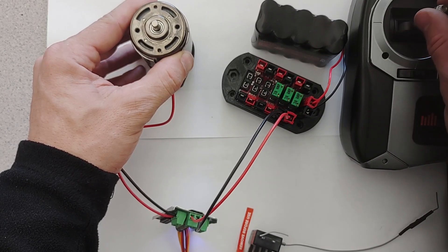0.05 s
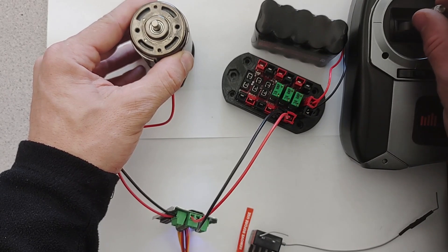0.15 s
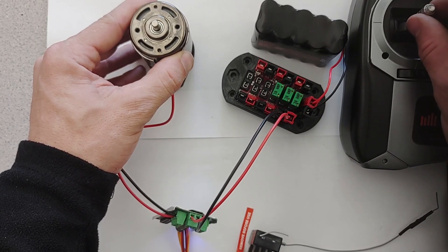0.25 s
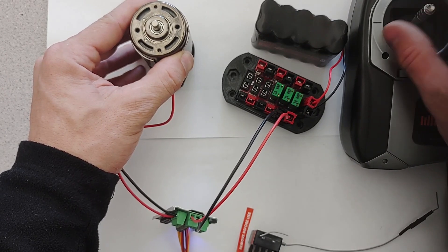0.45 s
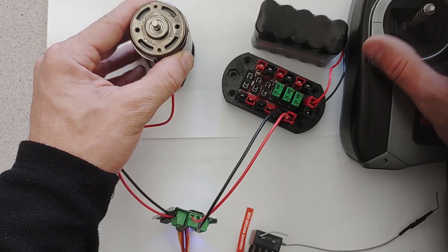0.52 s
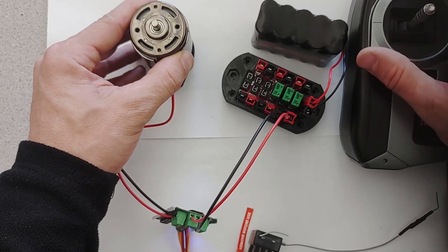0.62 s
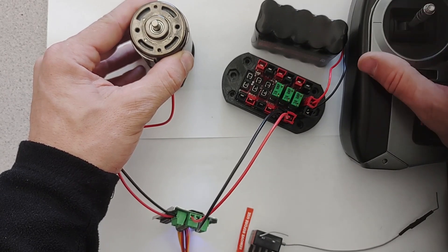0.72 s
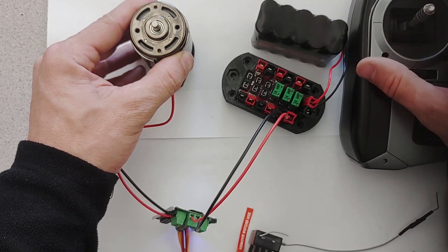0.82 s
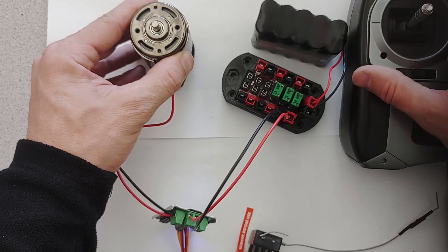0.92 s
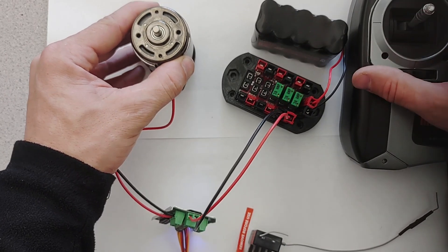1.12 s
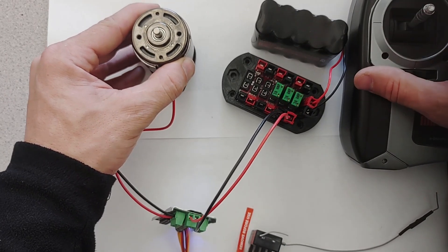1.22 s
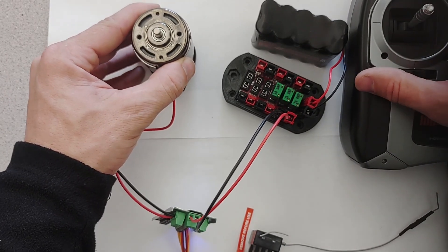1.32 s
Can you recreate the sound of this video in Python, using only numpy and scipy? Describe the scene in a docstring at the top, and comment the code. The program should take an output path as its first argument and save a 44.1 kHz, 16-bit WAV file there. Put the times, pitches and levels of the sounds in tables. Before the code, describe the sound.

A small hand-held electric motor spins up from about 0.1 s, peaks near 0.32 s with bright raspy hiss and a rising whine, then drops in pitch and fades by 0.5 s. A soft plastic lever click follows at 0.74 s, dull taps and finger brushes around 0.92 s, faint clicks at 1.2 and 1.31 s. Low steady machine hum and bassy room air continue throughout, close stereo microphone.

```python
"""A room's steady machine hum and low rush of air, then a small brushed motor spins up and coasts down once.
The motor is held in a hand, near a stereo microphone: shaped noise for its brush hiss, shaft orders
and noise ringing resonances for its casing, multiples of the shaft speed for its whine.
A plastic lever clicks (decaying sines); soft taps and fingers brushing plastic are filtered noise.
The hum is wavering sines, the air shaped noise."""
import sys
import numpy as np
from scipy import signal
from scipy.io import wavfile
from scipy.ndimage import uniform_filter1d

SR = 44100
rng = np.random.default_rng(int(sys.argv[2]) if len(sys.argv) > 2 else 0)


def wav_out(sig):
    """Save sig, one row per channel (or a flat mono array), as 16-bit PCM at SR to the path in sys.argv[1]."""
    wavfile.write(sys.argv[1], SR, np.round(np.clip(np.atleast_2d(sig).T, -1, 1) * 32767).astype(np.int16))


def volts_from_db(level):
    """Convert decibel levels to linear amplitude ratios."""
    exponent = np.asarray(level, float) / 20
    return 10 ** exponent


N = 59535  # samples

# Brush hiss over time, before its flicker. Each row: time in seconds, level in dB.
HISS_LEVEL = [(.1, -87), (.13, -66), (.164, -61), (.18, -55), (.202, -46), (.236, -38), (.266, -34),
              (.326, -32.5), (.366, -33.5), (.398, -36.5), (.43, -46.5), (.465, -58), (.478, -70),
              (.56, -85)]
# Shaft speed. Each row: time in seconds, speed in Hz.
SHAFT_SPEED = [(.1, 60), (.175, 123), (.195, 143), (.235, 170), (.265, 184), (.3, 208), (.318, 211),
               (.345, 203), (.357, 184), (.395, 163), (.428, 143), (.447, 125), (.49, 112), (.56, 50)]
# Colour of the brush hiss. Each row: frequency in Hz, relative density in dB.
HISS_COLOUR = [(3000, -40), (3900, -35), (4150, -13.5), (4850, -8.5), (5300, -1), (6260, -6), (7200, 2.5),
               (8300, 3), (9900, 2.5), (11300, -4), (12300, -3), (13300, 1), (15500, -2.5), (16500, -35)]
# Can modes in the hiss. Each row: frequency in Hz, width in Hz, gain in dB before RING_DB.
CAN_MODES = [(3900, 39, -23), (4300, 43, 3), (7310, 48, 8), (9000, 18, -22), (9810, 170, 5.5),
             (11380, 200, 12.5), (13700, 41, -7), (13500, 130, -17), (15600, 110, -10)]
# Likeness of the hiss at the two microphone ports. Each row: frequency in Hz, correlation before scatter.
HISS_LIKENESS = [(3000, .65), (16000, .6)]
# Side the hiss leans to. Each row: frequency in Hz, left minus right in dB.
HISS_LEAN = [(60, -4.5), (180, -4), (550, -2), (1650, -14), (4970, -7), (15000, -4.0)]
# Reflections turn one port against the other. Each row: frequency in Hz, phase scatter in radians rms.
HISS_PORT_SCATTER = [(3000, 3.16), (16000, 2.4)]
# Casing and table resonances that the shaft orders sweep through. Each row: frequency in Hz, nominal width
# in Hz, gain in dB, dB gained per dB of hiss, left minus right in dB, radians by which left leads.
CASING_MODES = [(163.8, 19, -6, .5, 9.5, 0.34), (193.2, 35, -6.5, 1.2, 13, 1.6),
                (357.4, 25.7, -14.5, 0.18, 9.5, 0.39), (647, 51, -20, 0.2, 0.5, 1.56),
                (743, 85, -11, 0.2, 3.5, 0.82), (829, 100, -10, 1.7, 15, 2.24),
                (1105, 44.5, -9.5, 0.46, -3, 0.51), (1250, 150, -16.5, 2.14, -4.5, .9),
                (2155, 170, -8.5, 0.47, -2, 1.4), (2353, 67, -6, 2.6, 18, 0.96), (2496, 67, -3, 9, -8, 1.4),
                (3019, 317, -9.5, 0.33, 0, 1.66), (3200, 110, -5, .45, 5, 2.6)]
# Orders that shake the casing. Each row: multiple of shaft speed, relative level in dB.
SHAFT_ORDERS = [(1, -2), (2, -18.5), (2.45, -7.5), (4, -16.5), (6, -6)]
# Commutator whine. Each row: multiple of shaft speed, level in dB rms at top speed before
# flicker and pan, left minus right in dB.
WHINE_ORDERS = [(10, -55, 0), (12, -53, 0), (14, -50, 1), (16, -55, 0), (20, -52, -8), (22, -51, -8),
                (24, -51, -5), (26, -50, -4)]
# How well the casing sounds the whine. Each row: frequency in Hz, gain in dB.
WHINE_RADIATION = [(1500, -20), (1900, -12), (2080, 0), (3400, 0), (3600, -14), (3950, -16), (4150, 0),
                   (6000, 0)]
# Lever clicks. Each row: start in seconds, peak of the first blow in dB before pan, delay of the second
# blow in seconds, second blow against the first in dB, left minus right in dB.
LEVER_CLICKS = [(.7352, -38, .0033, -1, 4), (1.1990, -42, .0036, -1, 2), (1.3082, -40, .0036, -1, 2)]
# Modes of the lever. Each row: frequency in Hz, relative level in dB, 60 dB decay time in seconds.
LEVER_MODES = [(2080, -22, 0.031), (2530, -14, 0.022), (2520, 0.5, 0.0057), (1156, -29.5, 0.021)]
# Soft taps. Each row: start in seconds, level in dB before rise and decay, centre in Hz,
# 60 dB decay time in seconds.
SOFT_TAPS = [(.7395, -59, 4500, .02), (.9165, -50, 700, .03), (.9555, -55, 2200, .03),
             (.9560, -59, 11000, .03)]
# Finger brushes. Each row: start in seconds, length in seconds, level in dB before fades, grain and pan,
# centre in Hz, width in Hz of each of two filters.
FINGER_BRUSHES = [(.535, .03, -71.5, 8840, 2960), (.640, .03, -79, 12000, 5000),
                  (.915, .08, -68.5, 13200, 3000), (.935, 0.064, -72.5, 9970, 3000),
                  (1.053, 0.021, -65.5, 10700, 700), (1.055, 0.024, -73, 13700, 2000),
                  (1.140, 0.078, -70, 9600, 9100), (1.180, 0.14, -69.5, 8800, 4240),
                  (1.320, .06, -65, 11000, 7100)]
# Machine hum. Each row: frequency in Hz, level in dB rms before waver and pan.
HUM_LINES = [(59.2, -87), (118.4, -56), (220.7, -52), (242.2, -56), (258.4, -56.5), (479.1, -79),
             (597.5, -84.5), (721.4, -81.5)]
# Colour of the room air. Each row: frequency in Hz, relative density in dB.
AIR_COLOUR = [(12, -53), (20, -20.5), (43, -14), (101, 0.5), (177, -5.5), (234, -5), (285, -10.5),
              (319, -23), (446, -25), (542, -33), (718, -24.5), (976, -30), (1570, -36), (2140, -35),
              (2530, -32), (2910, -31.5), (3840, -42), (9950, -48), (16000, -51.5)]
# Likeness of the air at the two ports. Each row: frequency in Hz, correlation before scatter.
AIR_LIKENESS = [(60, 0.77), (180, 0.81), (550, 0.5), (1650, 0.22), (4970, -0.02), (15000, 0.05)]
# Side the air leans to. Each row: frequency in Hz, left minus right in dB.
AIR_LEAN = [(60, -4.5), (180, 2), (550, -1.5), (1650, 3.5), (4970, 0.5), (15000, -5)]
# Reflections in the air sound. Each row: frequency in Hz, phase scatter in radians rms.
AIR_PORT_SCATTER = [(40, 0.18), (200, 0.28), (1000, 1.18), (4000, 1.1), (16000, 0.6)]

RING_DB = -6.5  # the can modes against the plain hiss
FULL_DB = -30  # hiss level at which the casing modes have their listed gain
CASING_DB, RATTLE_DB = -29, 8  # drive of the casing; noise beside the orders
TOP_HZ, WHINE_FALL_DB = 211, 90  # the whine loses WHINE_FALL_DB x the share of top speed missing
LEVER_LEAD = 0.36  # radians by which left leads
AIR_DB = -48.5  # rms of the air, left and right averaged


def evened(x):
    """Scales to rms 1."""
    return x / np.sqrt(np.mean(x ** 2) + 1e-20)


def read(points, hz):
    """Reads a curve along a logarithmic frequency axis."""
    f, value = np.transpose(points)
    return np.interp(np.log(hz + 1), np.log(f + 1), value)


def add(mix, s, sound):
    """Lays a stereo sound into the mix at s seconds."""
    part = mix[:, round(s * SR):][:, :sound.shape[1]]
    part += sound[:, :part.shape[1]]


def sides(db):
    """Left and right gains that differ by db."""
    return volts_from_db(np.array([[.5], [-.5]]) * db)


def resonate(x, hz, width):
    """A two-pole resonance of gain 1."""
    return signal.lfilter(*signal.iirpeak(hz, hz / width, SR), x)


def wobble(per_s):
    """Random drift of rms 1, smoothed twice over 1 / per_s seconds."""
    size = int(SR / per_s)
    return evened(uniform_filter1d(uniform_filter1d(rng.standard_normal(N), size), size))


def stereo_noise(gain, same, side, scatter, patchy_db, size):
    """Random short-time spectra with patches, as two microphone ports hear them; mid rms 1."""
    hz = np.fft.rfftfreq(size, 1 / SR)
    a, b, c, d, patches = rng.standard_normal((N * 4 // size + 5, len(hz), 5)).T
    patches = evened(uniform_filter1d(uniform_filter1d(patches, 6, 0), 6, 1))
    turn = read(scatter, hz) * evened(uniform_filter1d(rng.standard_normal(len(hz)), size=5))
    like = np.clip(read(same, hz), -1, 1)[:, None]
    left = a + 1j * b
    right = like * left + np.sqrt(1 - like ** 2) * (c + 1j * d)
    right = right * np.exp(-1j * turn)[:, None]
    tilt = volts_from_db(read(side, hz) / 2)[:, None]
    z = np.array([left * tilt, right / tilt]) * gain(hz)[:, None] * volts_from_db(patchy_db * patches)
    x = signal.istft(z, nperseg=size, noverlap=size * 3 // 4)[1][:, :N]
    return x / np.sqrt(np.mean(x.mean(0) ** 2))


def brush_hiss(level_db, turns):
    """Brushes hiss and spark over the segments, six pulses a turn, coloured by the can modes."""
    def colour(hz):
        rings = sum(volts_from_db(db) / (1 + (2 * (hz - f) / w) ** 2) for f, w, db in CAN_MODES)
        return volts_from_db(read(HISS_COLOUR, hz)) * (1 + volts_from_db(RING_DB) * rings)

    hiss = stereo_noise(colour, HISS_LIKENESS, HISS_LEAN, HISS_PORT_SCATTER, 2.43, size=1024)
    segments_db = 1.1 * np.cos(2 * np.pi * 6 * turns)
    sparks = volts_from_db(1.77 * wobble(1500) + segments_db + 1.47 * wobble(55))
    return volts_from_db(level_db) * sparks * hiss


def casing_ring(level_db, turns):
    """Shaft orders and noise ring the casing and table as the speed passes their resonances."""
    orders = sum(volts_from_db(db + 4.3 * wobble(40)) * np.cos(2 * np.pi * (k * turns + rng.random()))
                 for k, db in SHAFT_ORDERS)
    running = np.clip((level_db + 90) / 15, 0, 1)
    drive = orders + volts_from_db(RATTLE_DB) * rng.standard_normal(N)
    drive = signal.hilbert(drive * volts_from_db(CASING_DB) * running)  # complex, so that phase can be turned
    casing = np.zeros((2, N))
    for hz, w, db, follow, pan_db, lead in CASING_MODES:
        ring = resonate(resonate(drive, hz, 1.34 * w), hz, 1.52 * w)
        ring = (ring * np.exp(1j * np.array([[lead], [0]]))).real
        casing += volts_from_db(db + follow * (level_db - FULL_DB)) * sides(pan_db) * ring
    return casing


def commutator_whine(shaft_hz, turns):
    """Tones at multiples of the shaft speed, weaker as it slows and where the casing radiates badly."""
    missing = 1 - shaft_hz / TOP_HZ
    whine = np.zeros((2, N))
    for k, db, pan_db in WHINE_ORDERS:
        level = db + read(WHINE_RADIATION, k * shaft_hz) - WHINE_FALL_DB * missing + 1.3 * wobble(50)
        tone = np.cos(2 * np.pi * (k * turns + rng.random((2, 1)) / 3))
        whine += np.sqrt(2) * volts_from_db(level) * sides(pan_db) * tone
    return whine


def motor():
    """One run of the motor: hiss, casing and whine share the same shaft angle."""
    t = np.arange(N) / SR
    level_db = np.interp(t, *np.transpose(HISS_LEVEL), left=-120, right=-120)
    shaft_hz = np.interp(t, *np.transpose(SHAFT_SPEED))
    turns = np.cumsum(shaft_hz) / SR
    return brush_hiss(level_db, turns) + casing_ring(level_db, turns) + commutator_whine(shaft_hz, turns)


def click(s, peak_db, gap_s, second_db, pan_db):
    """Two quick soft blows ring the lever's modes."""
    t, lead = np.arange(0, .06, 1 / SR), np.array([[LEVER_LEAD], [0]])

    def ring(u):
        modes = sum(volts_from_db(db - 60 * u / t60) * np.sin(2 * np.pi * hz * u + lead) for hz, db, t60 in LEVER_MODES)
        return (1 - np.exp(-(u / 0.0014) ** 2)) * modes  # soft onset

    first = ring(t)
    second = volts_from_db(second_db) * ring(np.maximum(t - gap_s, 0))
    return s, volts_from_db(peak_db) * sides(pan_db) * (first + second) / abs(first).max()


def tap(s, start_db, hz, t60):
    """A dull damped knock: noise through two broad resonances, dying away."""
    t = np.arange(0, .05, 1 / SR)
    shake = rng.standard_normal((2, len(t))) + rng.standard_normal(len(t))  # partly common to both sides
    knock = resonate(resonate(shake, hz, .9 * hz), hz, .9 * hz)
    return s, volts_from_db(start_db - 60 * t / t60) * np.minimum(t / .0015, 1) * evened(knock)


def brush(s, length, db, hz, width):
    """Skin slides on plastic: a grainy swish, louder on the right."""
    n = round(length * SR)
    rub = rng.standard_normal((2, n)) + 0.56 * rng.standard_normal(n)  # partly common to both sides
    swish = resonate(resonate(rub, hz, width), hz, width)
    grain_db = 2.1 * wobble(150)[:n]
    return s, volts_from_db(db + grain_db) * signal.windows.tukey(n, .7) * evened(swish) * sides(-6)


def machine_hum():
    """Steady lines that waver a little in level and phase, louder on the right, left leading."""
    t = np.arange(N) / SR
    lead = np.array([[.4], [-.4]])  # radians
    hum = np.zeros((2, N))
    for hz, db in HUM_LINES:
        phase = 2 * np.pi * (hz * t + rng.random()) + 0.37 * wobble(18) + lead
        hum += np.sqrt(2) * volts_from_db(db + 0.79 * wobble(24)) * np.sin(phase)
    return hum * sides(-8.4)


def room_air():
    """The low rush of air: patchy noise, strongest in the bass."""
    air = stereo_noise(lambda hz: volts_from_db(read(AIR_COLOUR, hz)), AIR_LIKENESS, AIR_LEAN, AIR_PORT_SCATTER,
                       2.6, size=4096)
    return volts_from_db(AIR_DB) * air


def scene():
    """The motor in its room, with the lever, taps and fingers laid in at their times."""
    mix = motor() + machine_hum() + room_air()
    for table, source in (LEVER_CLICKS, click), (SOFT_TAPS, tap), (FINGER_BRUSHES, brush):
        for row in table:
            add(mix, *source(*row))
    return mix


def band_limit(x):
    """A steep low-pass at the top of the band."""
    return signal.sosfilt(signal.butter(12, 16300, fs=SR, output="sos"), x)


def record(dry):
    """The stereo microphone's signal, with nothing added to the mix."""
    return band_limit(dry)


dry = scene()
out = record(dry)
wav_out(out)
```